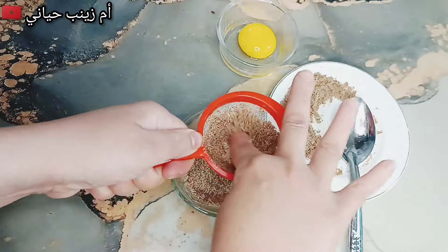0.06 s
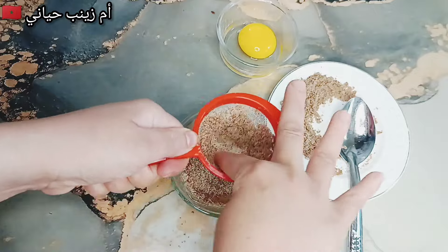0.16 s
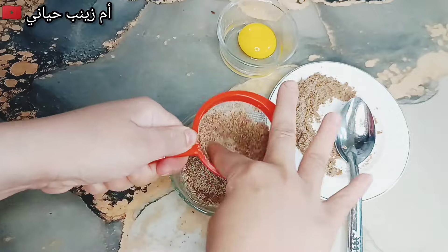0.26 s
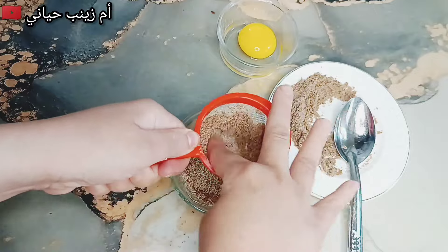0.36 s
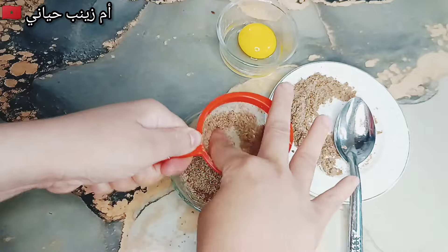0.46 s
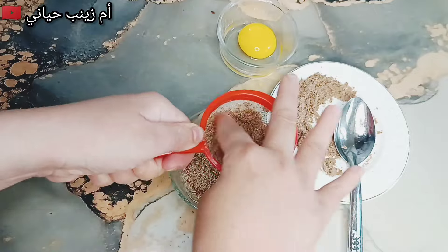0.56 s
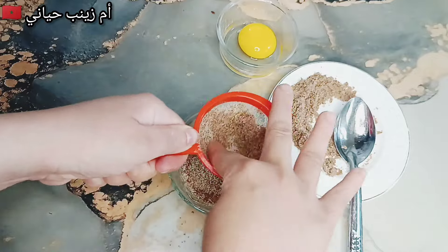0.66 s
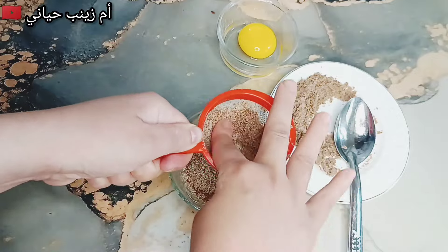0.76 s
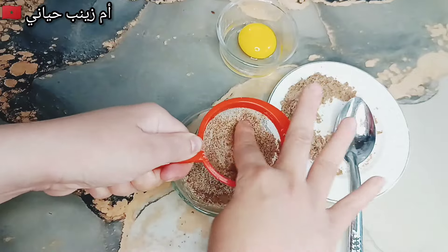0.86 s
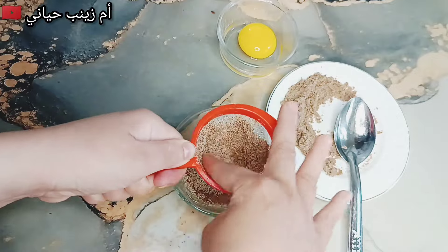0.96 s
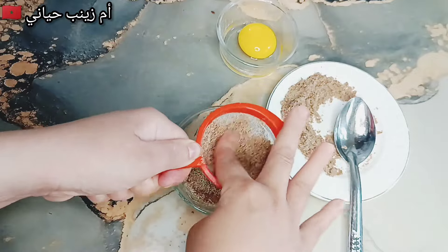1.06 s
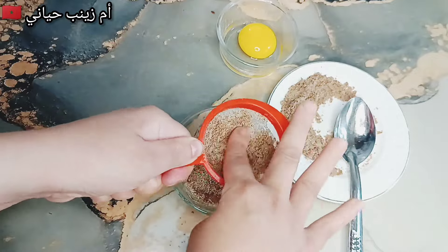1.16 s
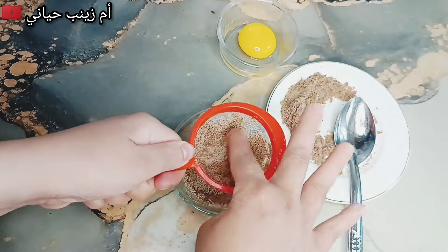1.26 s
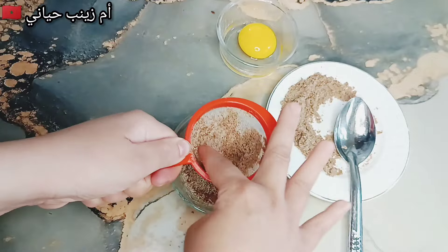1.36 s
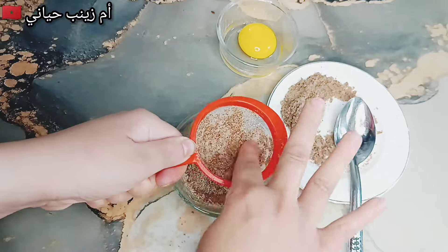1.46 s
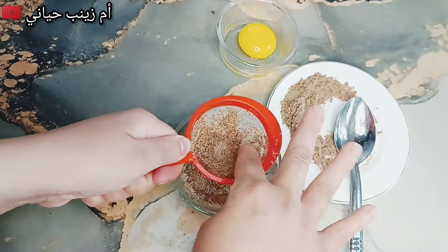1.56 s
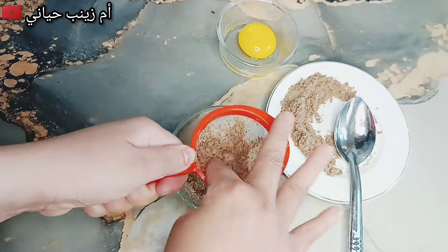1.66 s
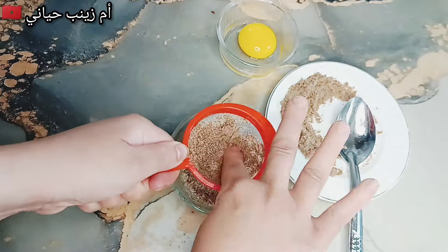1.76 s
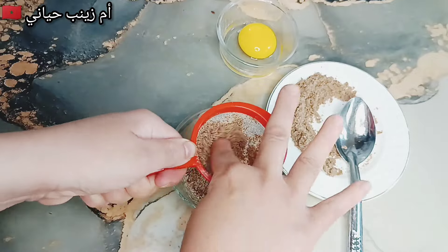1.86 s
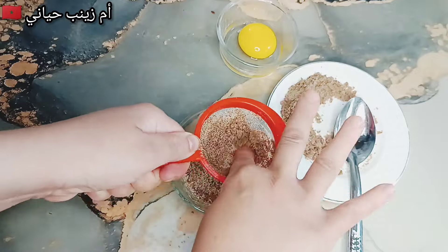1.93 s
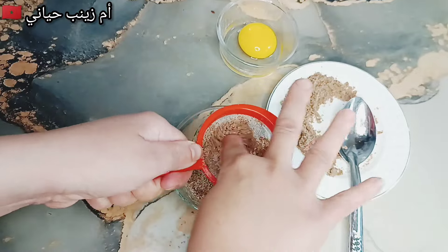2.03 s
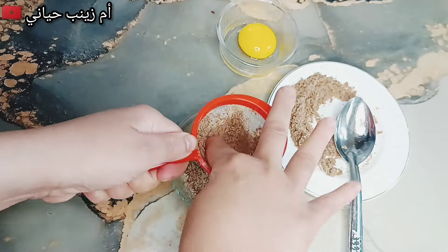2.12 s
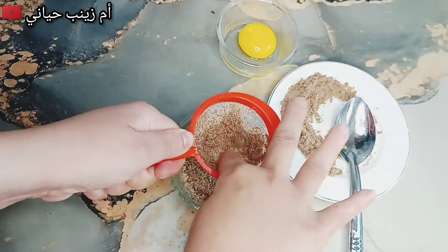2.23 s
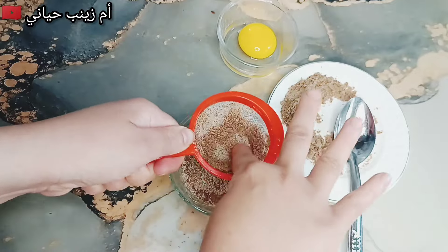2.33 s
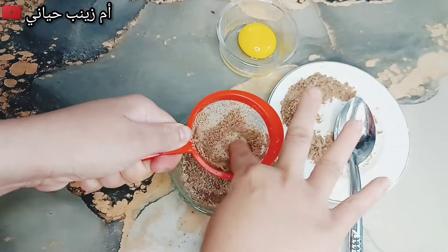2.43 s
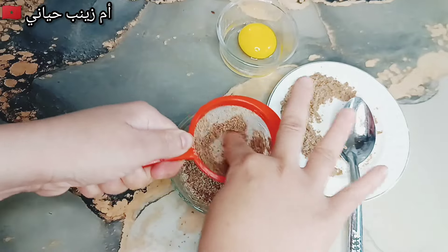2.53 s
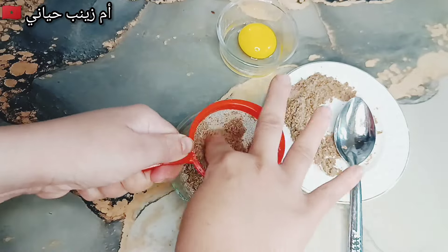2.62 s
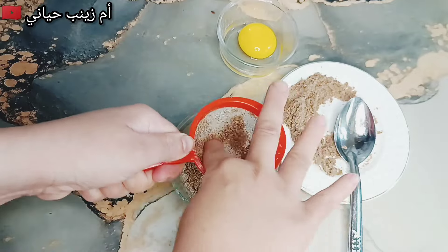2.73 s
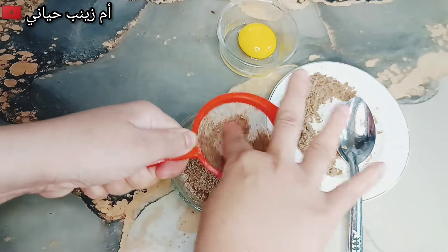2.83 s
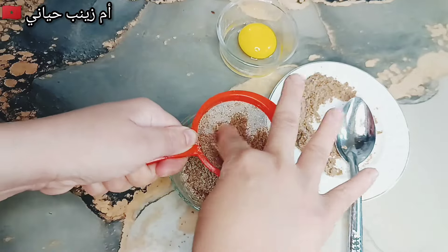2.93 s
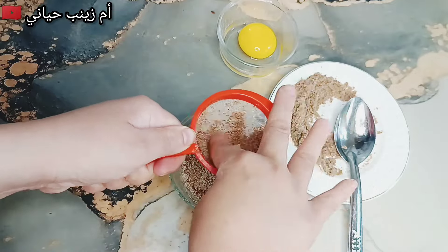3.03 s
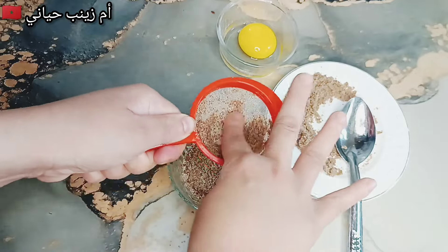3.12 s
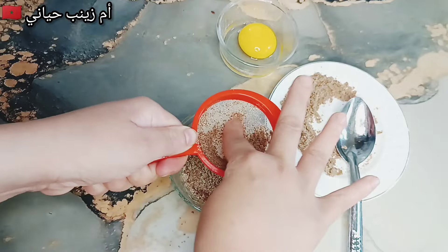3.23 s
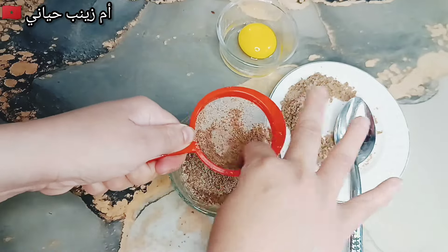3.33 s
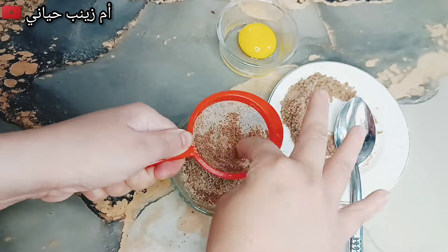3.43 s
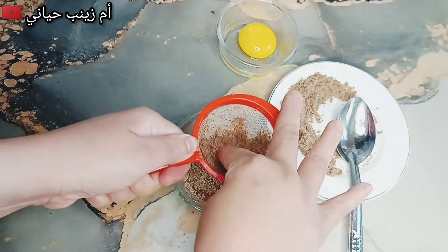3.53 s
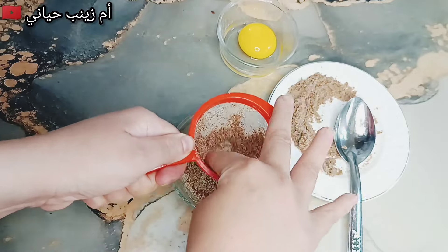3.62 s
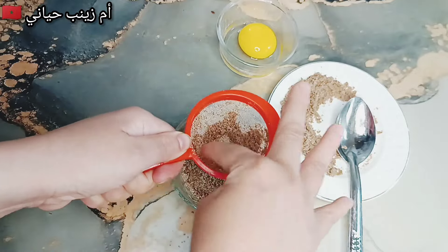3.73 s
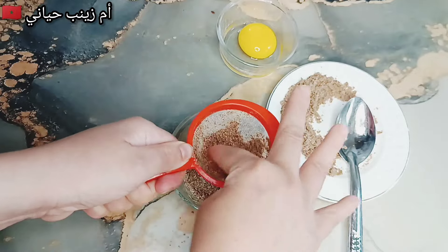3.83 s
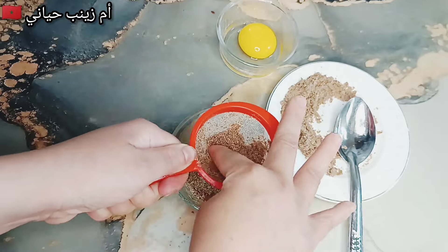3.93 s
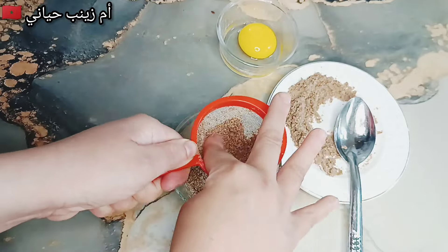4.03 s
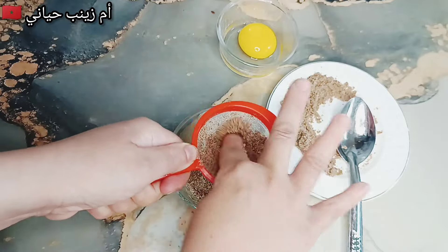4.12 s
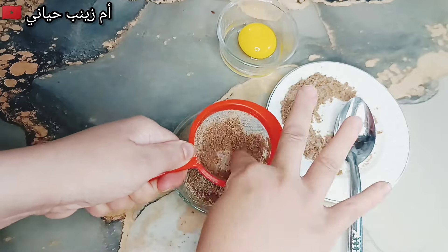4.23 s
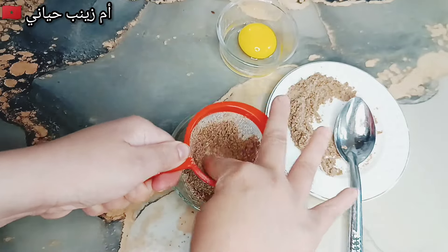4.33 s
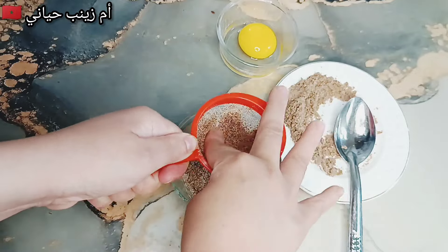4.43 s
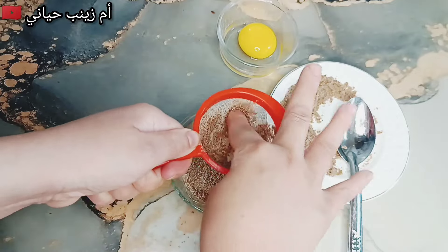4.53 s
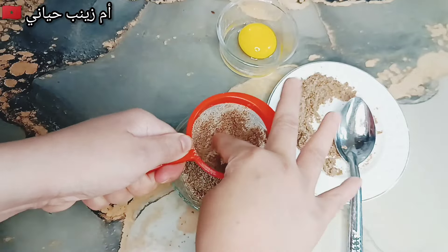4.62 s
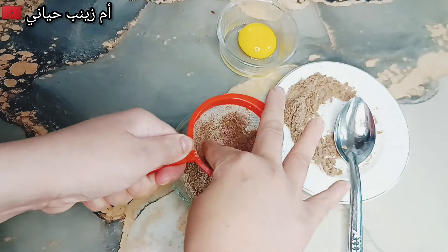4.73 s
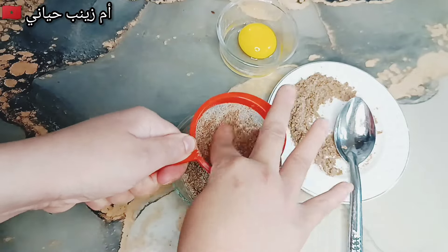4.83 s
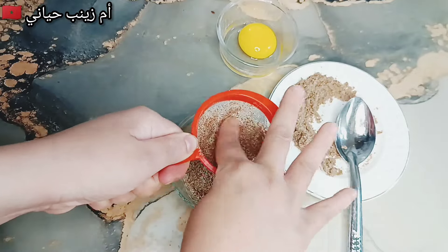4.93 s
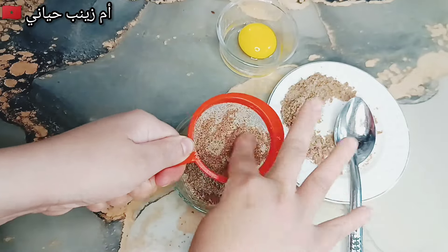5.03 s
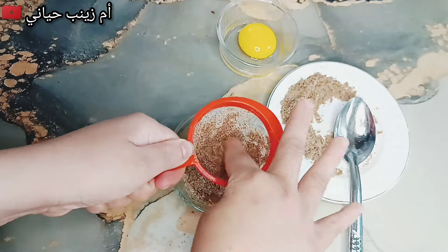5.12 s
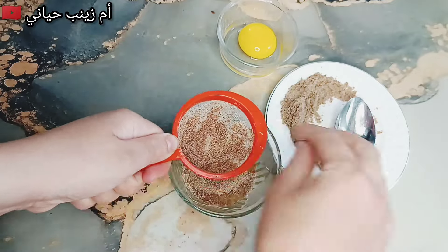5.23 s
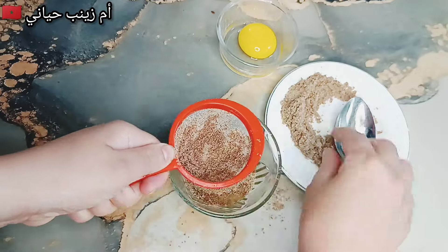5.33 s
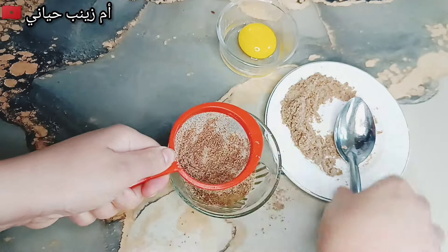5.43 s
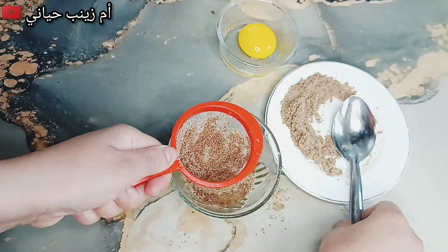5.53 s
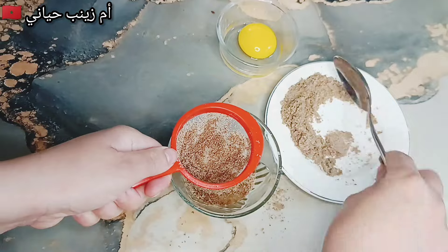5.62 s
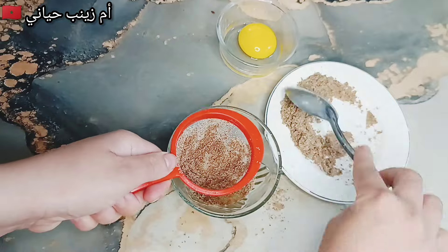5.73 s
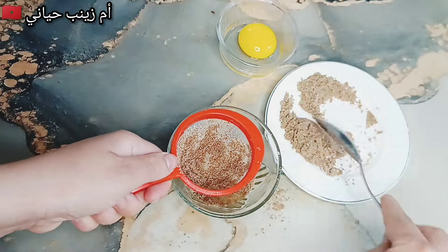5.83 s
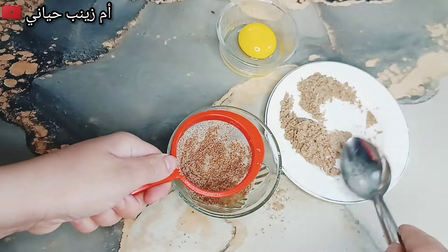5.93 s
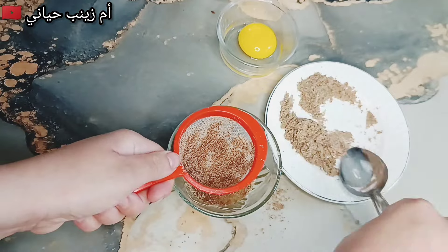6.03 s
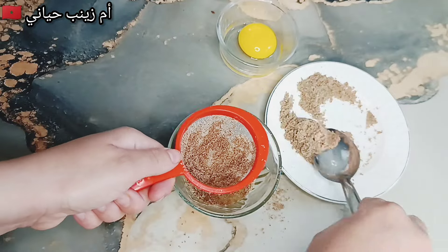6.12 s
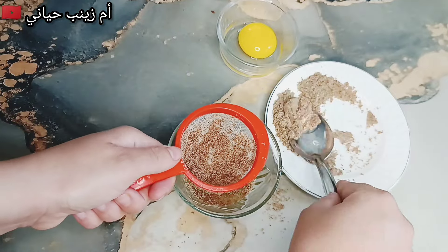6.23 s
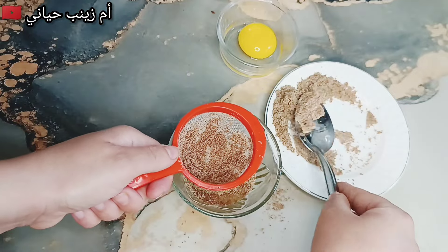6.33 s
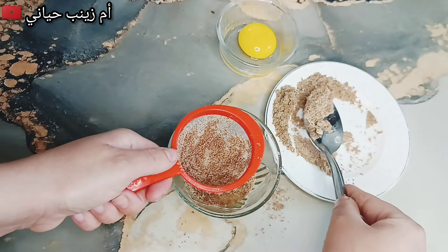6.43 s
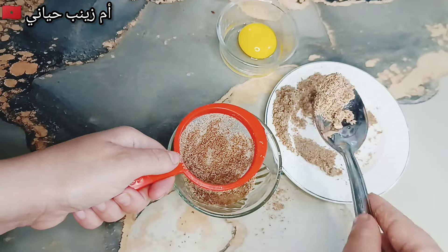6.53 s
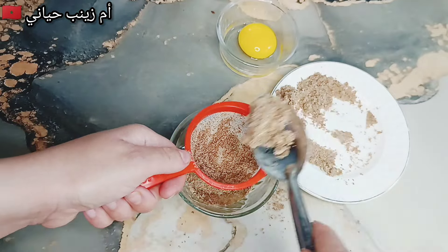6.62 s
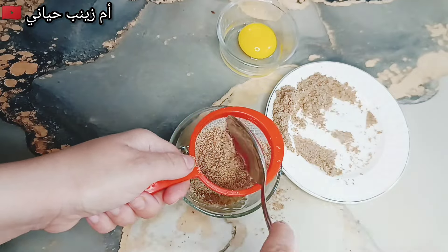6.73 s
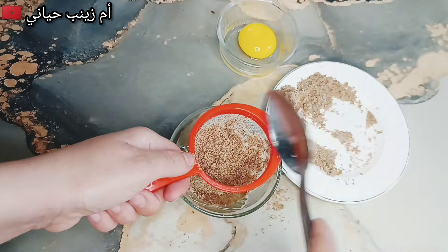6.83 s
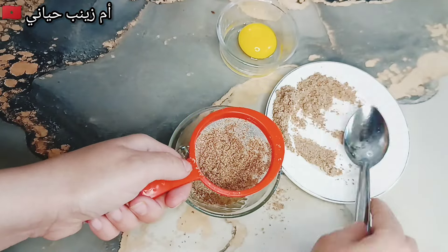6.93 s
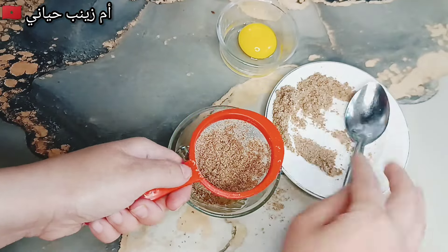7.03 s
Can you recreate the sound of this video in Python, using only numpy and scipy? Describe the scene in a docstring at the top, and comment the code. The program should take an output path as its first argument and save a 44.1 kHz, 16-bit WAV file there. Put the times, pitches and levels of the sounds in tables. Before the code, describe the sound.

Close phone pickup of soft gritty rubbing on a fine mesh, several quick strokes a second, uneven and very quiet over a low room hum. Then comes a much louder, bright clink of spoon on china with rattling, another knock, a short tap at the sieve, and finally a dull thump with a scraping, jingling slide as the spoon returns to the plate. The room is small and dry, with only short reflections.

```python
"""Sieving powder, then a spoon on a plate

A fingertip rubs powder through a small sieve in short strokes: rough noise scratches the mesh and rings the sieve.
Then a finger brushes a steel spoon, which leaves a china plate, knocks it, tips powder into the sieve and slides
back onto the plate. Each touch grates as noise and rings spoon and plate. The quiet kitchen hums low as filtered
noise, and a far rumble, noise in a narrow low band, swells now and then. A phone hears it through two ports.
"""
import sys
import numpy as np
from scipy import signal
from scipy.fft import rfft, irfft, next_fast_len
from scipy.io import wavfile
from scipy.ndimage import uniform_filter1d

SR = 44100
rng = np.random.default_rng(int(sys.argv[2]) if len(sys.argv) > 2 else 0)


def dump_mix(stems):
    """Bounce the given channels to the path in sys.argv[1] as a 16-bit WAV at rate SR."""
    frames = np.atleast_2d(stems).T  # one column per channel
    limited = np.clip(frames, -1, 1)  # hard clip at full scale
    pcm = np.round(limited * 32767).astype(np.int16)
    wavfile.write(sys.argv[1], SR, pcm)


N = 311771
SECONDS = np.arange(N) / SR


def undb(db):
    """Turn decibels into a plain amplitude factor."""
    return 10 ** (np.asarray(db) / 20)


def level(x, db):
    """Scale a sound to an average (rms) level in dB."""
    return x * undb(db) / np.sqrt(np.mean(x ** 2))


def colour(x, points):
    """Shape the spectrum by (Hz, dB) points, with a filter that never responds before its input."""
    size = 2 * next_fast_len(N // 2 + SR // 4)
    hz, db = np.transpose(points)
    bins_hz = np.arange(size // 2 + 1) * SR / size
    log_gain = np.interp(np.log(bins_hz + 1), np.log(hz), db) * np.log(10) / 20
    # folding the cepstrum onto positive times gives the matching minimum phase
    cepstrum = irfft(log_gain, size)
    cepstrum[1:size // 2] *= 2
    cepstrum[size // 2 + 1:] = 0
    return irfft(rfft(x, size) * np.exp(rfft(cepstrum)), size)[..., :N]


def ring(x, hz, t60, turn=0.):
    """One mode dies by 60 dB in t60 s, with a phase turn [rad]; white drive of rms 1 gives size 1."""
    shrink = np.exp(-np.log(1000) / (t60 * SR))
    step = 2 * np.pi * hz / SR
    gain = np.sqrt(1 - shrink ** 2)
    feed = [gain * np.sin(turn), gain * shrink * np.sin(step - turn)]
    return signal.lfilter(feed, [1, -2 * shrink * np.cos(step), shrink ** 2], x)


def walk(rate, count=N):
    """A smooth random wander around 0, spread near 1, with `rate` new values a second."""
    k = int(SR / rate)
    steps = np.repeat(rng.standard_normal(count // k + 1), k)
    return 1.1 * uniform_filter1d(uniform_filter1d(steps, k), k)[:count]


def grit(spread_db, channels):
    """Dense cracking grains, most tiny and a few large; the channels share the grain sizes."""
    sizes = undb(spread_db * np.minimum(rng.exponential(size=N), 6.5))
    return level(rng.standard_normal((channels, N)) * sizes, 0)


def sides(pan_db):
    """Left and right factors for a left-minus-right difference in dB."""
    return undb(np.array([pan_db, -pan_db]) / 2)


def patchy(x, rate, depth_db, count=8):
    """Slices of the spectrum swell and sink on their own, as grains of changing size come under the finger."""
    edges_hz = np.linspace(2500, 12000, count)
    lows = [signal.lfilter(*signal.butter(2, hz, fs=SR), x) for hz in edges_hz]
    slices = [high - low for low, high in zip([0 * x] + lows, lows + [x])]
    return level(sum(part * undb(depth_db * walk(rate)) for part in slices), 0)


def rubbing():
    """Grains scratch the mesh and shake the sieve's modes, most of all near each stroke's favoured pitch."""
    # strokes over the mesh, the last two by the spoon bringing powder; length starts after the rise:
    # (time [s], relative scratch level [dB], rise [ms], length [ms], ring against scratch [dB],
    # favoured pitch of the ring [Hz], a loose choice for faint strokes)
    strokes = [(0.0, -65.5, 1.1, 46, 5, 5400), (0.052, -55.5, 14, 10, -3.5, 1630),
               (0.169, -56.5, 10, 14, -1.5, 1810), (0.264, -66.5, 21, 28, 3, 1350),
               (0.29, -72, 31, 40, -1, 1350), (0.324, -64, 1.5, 8.6, 1.5, 1810),
               (0.496, -63.5, 7.6, 36, -7, 800), (0.622, -68, 31, 37, 0, 1350),
               (0.766, -66.5, 25, 51, -7.5, 4570), (0.886, -58.5, 6.9, 16, -6.5, 3880),
               (0.917, -65, 26, 47, -9, 2500), (1.028, -78.5, 2.2, 16, 11, 1350),
               (1.072, -65.5, 12, 34, -2.5, 5360), (1.189, -63, 8, 41, -4, 6960),
               (1.313, -66.5, 27, 17, -3.5, 790), (1.495, -73.5, 30, 44, 2, 810),
               (1.573, -66, 14, 25, -16, 2500), (1.635, -64, 5.8, 31, -7, 1810),
               (1.661, -65.5, 30, 42, -8, 6960), (1.878, -63.5, 2.8, 12, 5, 2500),
               (1.993, -61, 25, 24, -0.5, 4530), (2.144, -66, 3.3, 28.5, 9.5, 2430),
               (2.262, -71, 2.4, 19, 12.5, 2580), (2.32, -71, 3, 22, 5, 1350),
               (2.37, -67.5, 11, 37, 3.5, 2480), (2.421, -53, 1.8, 21, 0, 4470),
               (2.475, -57, 16, 27, 0, 2550), (2.563, -64, 6.3, 16, -2, 6300),
               (2.578, -71, 36, 54, 3, 1810), (2.702, -57.7, 4.8, 15, 3, 2530),
               (2.721, -70.5, 29, 37, -2, 1810), (2.889, -66, 10, 22, 1.5, 1630),
               (2.987, -73.5, 26, 40, 3, 800), (3.08, -64.5, 2.3, 25, -5, 1350),
               (3.176, -72.5, 34, 32, -1, 800), (3.378, -71.5, 15, 31, 6, 800),
               (3.485, -74.5, 5.2, 96, 3, 6200), (3.547, -60.5, 2, 20.5, 8, 1660),
               (3.638, -59.5, 23, 36, -2.5, 6200), (3.733, -68, 36, 30, -8, 6300),
               (3.943, -65.5, 15, 37, -4, 800), (4.083, -60, 18.6, 22, 0.5, 3950),
               (4.142, -67, 29, 89, -5, 805), (4.307, -63, 8, 41, -5, 6960),
               (4.434, -61.5, 15, 35, -12, 6960), (4.555, -63.5, 15, 34, -8, 6300),
               (4.658, -56, 6.9, 12, -5.5, 1810), (4.68, -62, 27, 19, -18, 6300),
               (4.793, -61, 28, 24, -12, 2500), (4.881, -71, 24, 118, -8, 800),
               (6.5515, -39, 1, 34, -10.5, 2050), (6.616, -63.5, 13.3, 20.5, 10, 2020)]
    # finger resting in the powder and stirring it between strokes: (time [s], relative level [dB])
    stirring = [(0.0, -71), (0.18, -70.5), (0.34, -73), (0.74, -103), (1.15, -85), (1.58, -84), (1.77, -68),
                (2.55, -71.5), (3.17, -92), (3.76, -85), (4.03, -71), (4.3, -92), (4.7, -98.5), (5.0, -83),
                (5.3, -104)]
    # spectrum of the scratching: (frequency [Hz], relative level per Hz [dB])
    scratch_colour = [(710, -37.5), (1200, -16), (1800, 1), (2630, -12.5), (2810, -4.5), (5350, -5.5),
                      (6100, -3.5), (9040, -11), (12000, -25), (15100, -6), (16300, -20)]
    # modes of sieve frame and the glass bowl under it: (frequency [Hz], t60 [s], relative level [dB])
    sieve_modes = [(802, 0.059, -2), (1350, 0.047, -13), (1646, .04, 1), (1814, 0.045, 4.5),
                   (2077, .03, 0.5), (2415, 0.021, -3.5), (2586, 0.055, -1.5), (3283, .04, -0.5),
                   (3874, 0.045, -2.5), (4415, .03, -3), (4600, .03, -4), (5440, 0.023, -4),
                   (6210, .03, -1), (6960, .03, -4), (7460, .025, -12), (8930, .025, -12.5),
                   (10660, 0.022, -20)]
    modes_hz = np.array(sieve_modes)[:, 0]
    hold_share = 0.51  # of a stroke's length at full pressure; the rest dies away
    firm_db = -64.5  # middle of the change from light strokes to firm ones
    light_pan_db, firm_pan_db = 1.5, -1  # left minus right, before a random shift per stroke

    # powers, so that overlapping strokes add like noise
    stir = undb(np.interp(SECONDS, *np.transpose(stirring), right=-100) + 1.5 * walk(25)) ** 2
    scratch = stir * np.ones((2, 1))
    wander = undb(-18.0 + 6 * walk(9.8))  # each mode reads this slow chance from another place
    shake = np.array([np.roll(wander, k) * stir for k in rng.integers(N, size=len(sieve_modes))])
    for s, db, rise_ms, length_ms, ring_db, favoured_hz in strokes:
        hold_ms, fall_ms = hold_share * length_ms, (1 - hold_share) * length_ms
        pan_db = np.interp(db - firm_db, [-4, 4], [light_pan_db, firm_pan_db])
        pan_db += 1.6 * rng.standard_normal()
        i = slice(max(int((s - .04) * SR), 0), int((s + .22) * SR))
        ms = 1000 * (SECONDS[i] - s) - rise_ms  # time from the start of full pressure
        short = np.maximum(-ms / rise_ms, 0) + np.maximum((ms - hold_ms) / fall_ms, 0)
        push = undb(db - 12.3 * short ** 1.3) ** 2
        scratch[:, i] += sides(pan_db)[:, None] ** 2 * push
        # modes far from the favoured pitch are driven less, down to a random floor
        distance_db = 40 * np.abs(np.log2(modes_hz / favoured_hz))
        most_db = 12 + 4 * rng.standard_normal(len(sieve_modes))
        favour_db = ring_db + 1.5 - np.minimum(distance_db, most_db)
        shake[:, i] += undb(favour_db)[:, None] ** 2 * push

    uneven = undb(1.9 * walk(300))  # the finger sticks and slips
    hiss = patchy(colour(grit(4.5, channels=2), scratch_colour), 45, 4.05)
    out = undb(-1.8) * hiss * np.sqrt(scratch) * uneven
    # the sieve's drive keeps only the left-right balance of the scratching
    grains = grit(3.0, channels=2) * uneven * np.sqrt(scratch / scratch.mean(axis=0))
    for (hz, t60, db), drive in zip(sieve_modes, np.sqrt(shake)):
        out += undb(db) * ring(grains * drive, hz, t60)
    return out


def hum():
    """Hum and hiss waver a little in level; bass is alike at both ports, treble unrelated."""
    # spectrum of the quiet room: (frequency [Hz], relative level per Hz [dB])
    room_colour = [(15, -32.5), (25, -11), (76, -2.5), (264, -11.5), (338, -7.5), (721, -18.5), (1030, -16),
                   (1420, -16), (2510, -23.5), (4940, -34), (6140, -35), (9480, -46.5), (13900, -52.5),
                   (15000, -37), (16300, -47)]
    alike_hz = 420  # below this the ports share the sound
    mid, left, right = rng.standard_normal((3, N))
    ports = np.array([left, right])
    split = signal.butter(2, alike_hz, fs=SR, output="sos")
    air = ports + signal.sosfilt(split, 1.16 * mid - 0.29 * ports)
    # -62.5 dB before the wavering and the bass cut
    wavering = level(colour(air, room_colour), -62.5) * undb(.6 * walk(3))
    return signal.sosfilt(signal.butter(2, 95, "high", fs=SR, output="sos"), wavering)


def rumble():
    """Low noise, mostly shared by the ports, wavers far off and swells at set times."""
    # swells, the last one a thump through the counter as the spoon lands:
    # (peak time [s], level [dB], length [s])
    swells = [(0.0, -58.5, 0.08), (0.667, -66, .1), (1.024, -70, .1), (2.604, -64, .25), (3.465, -66, .3),
              (3.8, -64, 0.084), (4.276, -66, .12), (5.295, -68.5, .12), (6.26, -60.5, .2),
              (6.448, -61, .1), (6.812, -49.5, .06)]
    far = rng.standard_normal(N) + .3 * rng.standard_normal((2, N))
    low_band = signal.butter(2, [43, 108], "band", fs=SR, output="sos")
    power = undb(-75 + 3.5 * walk(9)) ** 2  # -75 dB with a waver of about 3.5 dB
    for s, db, length in swells:
        power += undb(db) ** 2 * np.exp(-(3 * (SECONDS - s) / length) ** 2)
    return level(signal.sosfilt(low_band, far), 0) * np.sqrt(power)


def spoon_touches(first, count):
    """Each touch presses for a moment and dies as chatter; returns its pushes and the blows on the modes."""
    # finger brushing the spoon, then spoon touching china:
    # (time [s], relative level [dB], rise [ms], chatter t60 [ms], treble against the rest [dB], place)
    touches = [(5.348, -68.5, 19, 116, 3.5, "rim"), (5.405, -76, 4, 71, -10, "well"),
               (5.570, -17, 0.25, 55, -1, "lift"), (5.585, -30, 3, 153, -11, "lift"),
               (5.600, -32.5, 1.1, 53, -6, "lift"), (5.624, -36.5, 6.2, 52, 1, "rim"),
               (5.632, -29, 0.56, 75, -16, "rim"), (5.661, -41.5, 3.4, 40, -26, "lift"),
               (5.8907, -24.5, 0.6, 52, -1.2, "well"), (5.895, -30.5, 1.2, 47, -0.5, "well"),
               (5.907, -40, 2.2, 109, -14, "well"), (5.944, -59.5, 4.4, 29, -6, "graze"),
               (5.999, -70.5, 12, 120, -3, "graze"), (6.020, -69.5, 8.9, 100, 0, "graze"),
               (6.795, -29, 8.1, 31, -51, "heap"), (6.838, -66, 7.3, 60, 1.2, "lift"),
               (6.858, -27, 4.7, 144, 3.5, "slide"), (6.877, -34.5, 2.2, 230, 7.5, "slide"),
               (6.896, -31, 1.4, 190, 1, "slide"), (6.930, -36, 5.4, 273, 7.5, "slide"),
               (6.939, -25.5, 0.76, 62, -5.5, "lift"), (6.961, -38, 8.9, 92, 5, "slide"),
               (6.990, -40.5, 15.5, 36, 4.5, "slide"), (7.013, -38, 3.8, 35, 0, "lift")]
    # what rings against the grating, by the kind of contact:
    # place: (spoon [dB], plate rim [dB], plate well [dB], left minus right [dB])
    places = {"lift": (-4.5, -3, -15, 1.6), "rim": (-18.5, 3.5, -19, -3), "well": (-24.5, -14, 3.5, -2),
              "heap": (-24, -12, -9.5, -0.5), "graze": (-18, -5, 6.5, -6), "slide": (3, -34, -10.5, -3)}
    push = np.zeros((5, 2, count))  # grating, its treble, spoon, rim, well; left and right
    blows = (grit(2.03, channels=1) * undb(1.2 * walk(400)))[:, first:]
    for s, db, rise_ms, t60_ms, treble_db, place in touches:
        spoon_db, rim_db, well_db, pan_db = places[place]
        start = int(s * SR) - first
        i = slice(start, start + SR // 3)
        ms = 1000 * (np.arange(count)[i] - start) / SR
        rise = np.sin(np.pi / 2 * np.minimum(ms / rise_ms, 1))
        force = rise * np.exp(-np.log(1000) * np.maximum(ms - rise_ms, 0) / t60_ms)
        shares = undb(db + np.array([0, treble_db, spoon_db, rim_db, well_db]))
        added = shares[:, None, None] * sides(pan_db)[:, None] * force
        push[:, :, i] = np.hypot(push[:, :, i], added)  # overlapping touches add as powers
        # sudden touches start with one hard knock
        blows[:, start + int(rise_ms * SR / 1000)] = undb(13) * np.exp(-rise_ms / 1.6)
    return push, blows


def spoon():
    """Each touch is a blow and a dying chatter that grates as noise and rings spoon and plate."""
    # steel grating on glaze: (frequency [Hz], relative level per Hz [dB])
    grate_colour = [(350, -53.5), (600, -17.5), (2290, -2), (2710, 0.5), (3980, -7.5), (4270, -6),
                    (4640, -9), (6200, -2), (10900, -32.5), (15400, -20.5), (16300, -15)]
    # modes of the spoon, the plate's rim and its well:
    # (frequency [Hz], t60 [s], relative level [dB], left minus right [dB])
    spoon_modes = [(1177, .07, -23, 4), (2740, .07, 2, 5), (2930, 0.12, -13.5, 2.5), (4304, .08, -0.5, -8),
                   (4359, 0.07, -7.5, -1), (5040, .1, -16, 1.5), (6050, .08, -8, -3.5),
                   (5960, .07, -9.5, -9), (6330, 0.09, -14, 1.5), (7407, .09, -8.5, -5.5),
                   (8810, 0.066, -17.5, 10.5), (9980, 0.043, -15.5, 6), (12100, .08, -23.5, -2),
                   (12640, .1, -23, -2), (13430, .1, -26, 0.5), (14390, .08, -17.5, -2.5),
                   (14925, .06, -9, -5.5), (15355, .07, -15.5, -1), (15520, 0.05, -9, -3.5)]
    rim_modes = [(586, 0.068, -23, -5.5), (1247, 0.053, -16, 6.5), (2485, .05, -6.5, 3),
                 (3530, .06, -7.5, -1.5), (4400, 0.062, -1.5, -2), (5520, .05, -14, -1),
                 (6060, 0.055, -5, -8), (7980, 0.05, -16, 0), (10100, .06, -14.5, 8)]
    well_modes = [(731, .06, -29.5, -2), (915, .06, -21, -3.5), (1730, .05, -14, 3),
                  (2000, 0.028, -4.5, 4.5), (2330, 0.05, -11.5, 0), (3450, .06, -10.5, -2),
                  (3685, 0.055, 3.5, 3), (5530, .06, -14, -0.5), (6810, .06, -10, 2.5),
                  (7047, .05, -17, -4.5), (8490, .04, -8.5, 1.5), (10500, .05, -28, 0)]
    first = int(5.2 * SR)  # no touch comes before this sample
    count = N - first
    push, blows = spoon_touches(first, count)
    grate = level(colour(grit(2.8, channels=2), grate_colour), 2.8) * undb(2.2 * walk(350))
    grate = grate[:, first:]

    # treble share of each touch: the higher the sound, the more this share changes it
    bright = push[1, 0] / (push[0, 0] + 1e-9)
    low = signal.sosfilt(signal.butter(4, 4800, fs=SR, output="sos"), grate)
    middle = signal.sosfilt(signal.butter(4, 9000, fs=SR, output="sos"), grate)
    out = push[0] * (low + bright ** 0.28 * (middle - low) + bright * (grate - middle))
    for modes, drive in zip((spoon_modes, rim_modes, well_modes), push[2:] * blows):
        for hz, t60, db, pan_db in modes:
            # each mode reaches the two ports over different paths, the more so the higher it is
            turns = rng.standard_normal(2) * min(hz / 6000, 1.3)
            # the point of contact wanders, so each mode is fed more at one moment and less at the next
            treble = bright ** np.clip(np.log2(hz / 4000) / 1.3, 0, 1)
            fed = drive * undb(1.8 * walk(70, count=count)) * treble
            rung = np.array([ring(f, hz, t60, turn) for f, turn in zip(fed, turns)])
            out += undb(db) * sides(pan_db)[:, None] * rung
    # small things radiate no bass
    out = signal.sosfilt(signal.butter(4, 720, "high", fs=SR, output="sos"), out)
    return np.pad(out, ((0, 0), (first, 0)))


def nearby(x, t60, db):
    """Counter and crockery send a short dense echo, another one to each port."""
    t = np.arange(SR // 4) / SR
    fading = rng.standard_normal((2, len(t))) * np.exp(-np.log(1000) * t / t60)
    echo = level(fading, db) / np.sqrt(len(t))  # db: echo energy against the direct sound
    return x + signal.oaconvolve(x.mean(axis=0, keepdims=True), echo, axes=1)[:, :N]


def scene():
    """Finger and spoon with their echoes, over the hum and the rumble."""
    return nearby(rubbing(), 0.055, -5.5) + hum() + rumble() + nearby(spoon(), .05, -8)


def record(dry):
    """The small microphone lifts the last treble and the phone cuts the top above 15800 Hz."""
    # the microphone's peak at the top: (frequency [Hz], gain [dB])
    port_gain = [(12500, -1), (14300, -2.5), (15200, 5.5), (15900, 6)]
    top_cut = signal.ellip(10, .2, 80, 15800, fs=SR, output="sos")
    return signal.sosfilt(top_cut, colour(dry, port_gain))


dry = scene()
out = record(dry)
dump_mix(out)
```